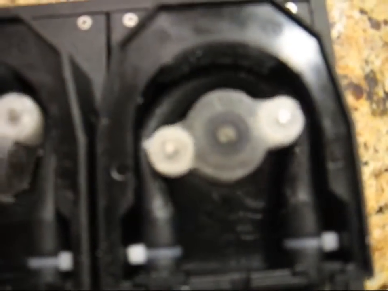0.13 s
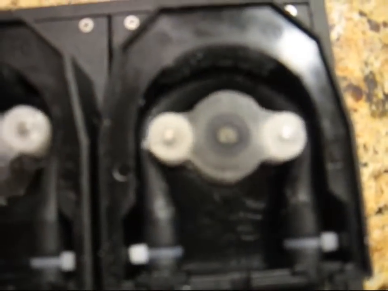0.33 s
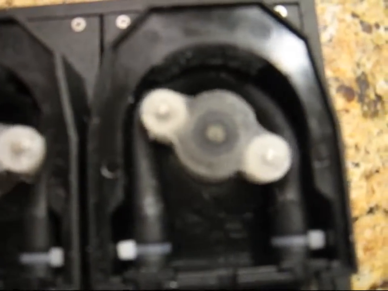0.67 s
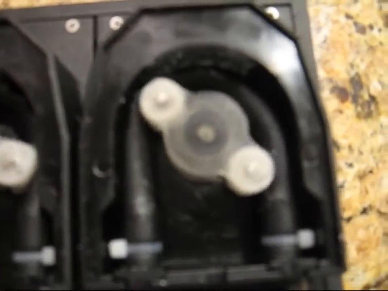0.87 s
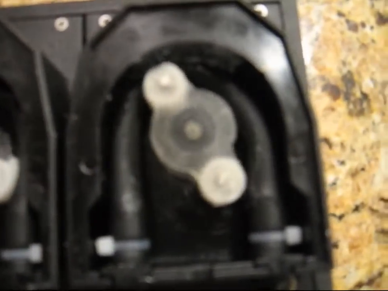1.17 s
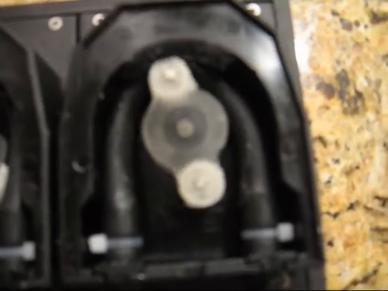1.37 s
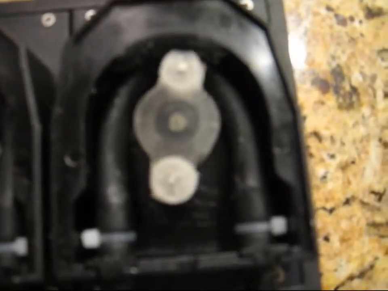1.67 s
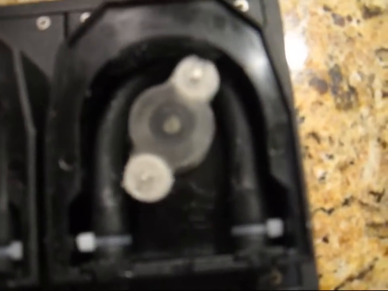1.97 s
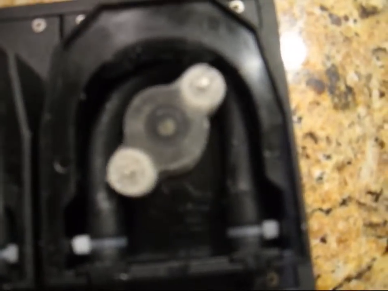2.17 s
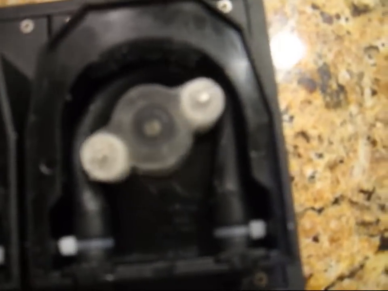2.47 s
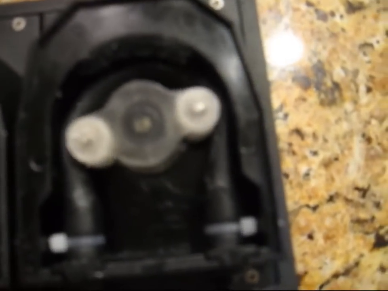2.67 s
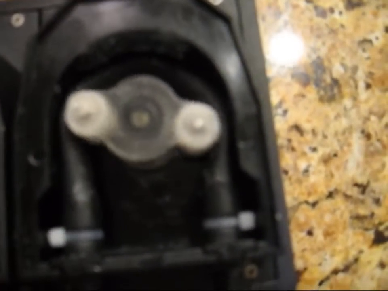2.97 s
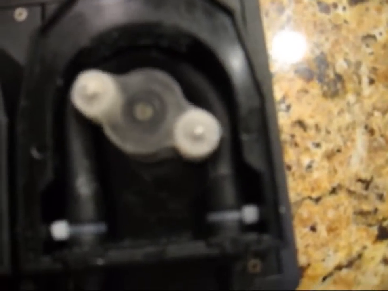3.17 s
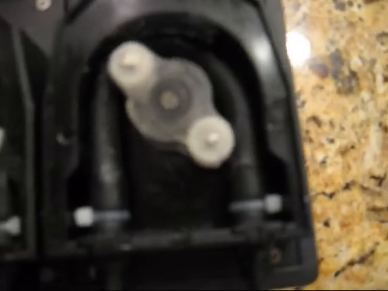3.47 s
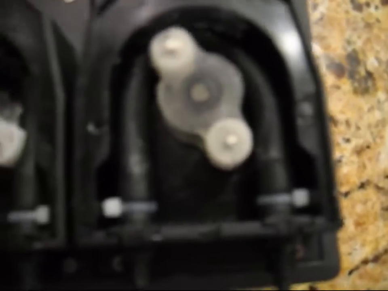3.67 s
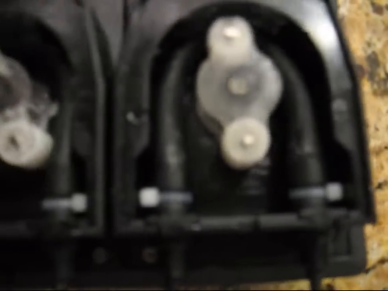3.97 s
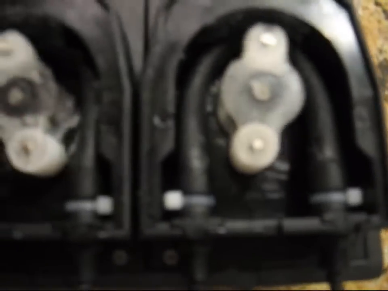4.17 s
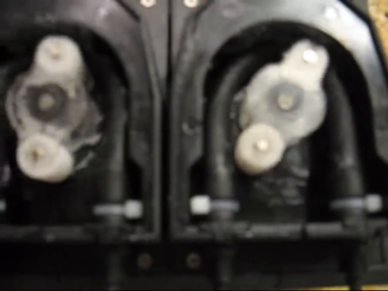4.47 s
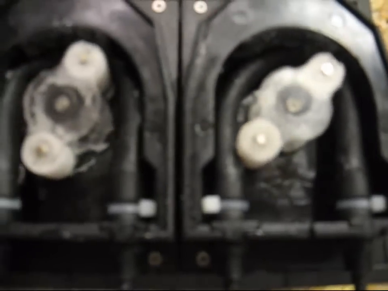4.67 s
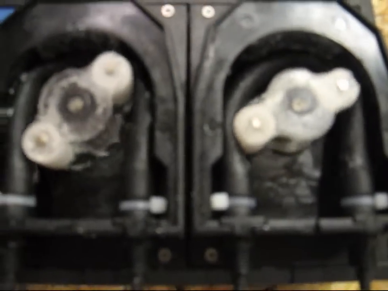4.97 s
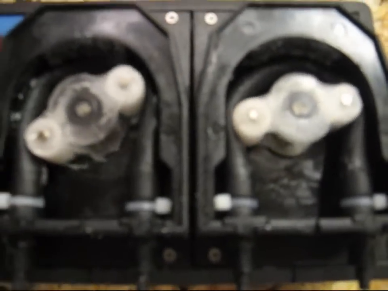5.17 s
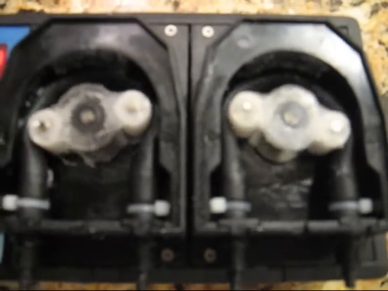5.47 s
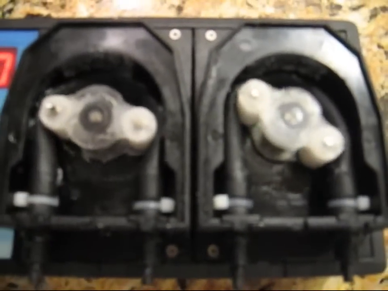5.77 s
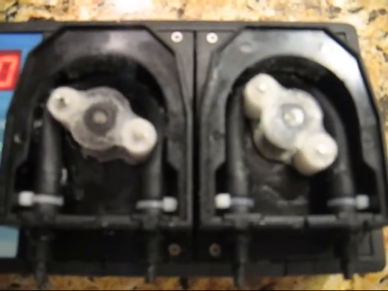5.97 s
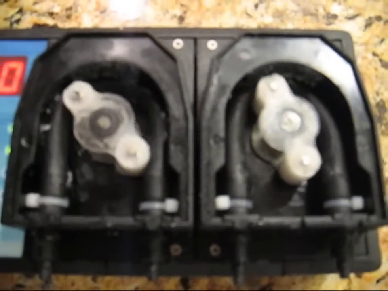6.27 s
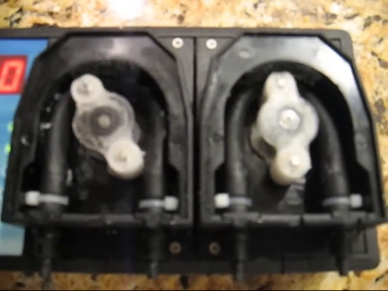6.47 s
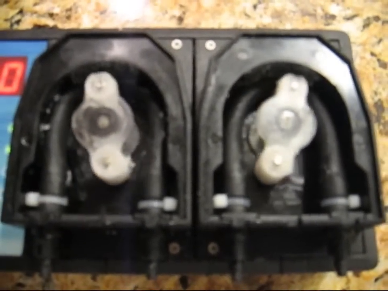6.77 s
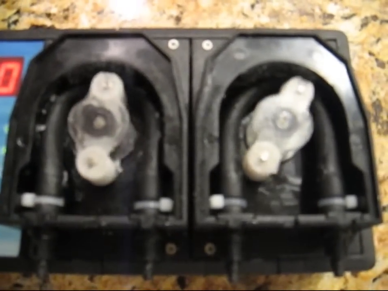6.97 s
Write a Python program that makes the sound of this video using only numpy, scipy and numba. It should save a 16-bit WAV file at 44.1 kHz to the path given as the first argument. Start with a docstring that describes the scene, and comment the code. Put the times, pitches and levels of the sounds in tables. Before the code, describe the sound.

A small pump motor hums and whines steadily with a soft pulsing throb, rollers ticking faintly, until loud plastic handling clatter bursts near the microphone.

```python
"""Two peristaltic pump heads turn slowly on a counter, close to the microphone of a hand-held camera.
The motors hum and whine on mains multiples; the gears sing and chatter, and one gear tone beats with the whine.
The rollers are filtered noise with faint sagging squeals; their ticks are short decaying modes.
Near five seconds the camera is handled: its case clatters and scrapes, and slow bumps push the microphone
so hard that the gain control ducks and recovers. Hiss and coarse sampling colour everything."""
import sys
import numpy as np
from scipy import signal
from scipy.fft import rfft, irfft
from scipy.io import wavfile
from scipy.ndimage import uniform_filter1d
from numba import njit

SR = 44100
rng = np.random.default_rng(int(sys.argv[2]) if len(sys.argv) > 2 else 0)


def to_wav(sig):
    """Store sig (one row per channel, or 1-D mono) as 16-bit WAV at the path in sys.argv[1].

    Samples outside -1..1 are clipped; the rate is SR.
    """
    pcm = np.clip(np.atleast_2d(sig), -1, 1) * 32767
    pcm = np.round(pcm).astype(np.int16)
    wavfile.write(sys.argv[1], SR, pcm.T)  # frames by channels


N = 313992
T = np.arange(N) / SR
FREQS = np.maximum(np.arange(N // 2 + 1) * SR / N, 1)
MAINS_HZ, SHAFT_HZ, PINION_HZ = 60, 44.55, 143.3


def undb(db):
    """Decibels to gain."""
    return 10 ** (np.asarray(db) / 20)


def unit(x):
    """Scale to rms 1."""
    return x / np.std(x)


def white():
    """White noise of rms 1."""
    return rng.standard_normal(N)


def walk(rate):
    """Smooth random wander of spread 1, mostly slower than the rate in Hz."""
    return unit(irfft(rfft(white()) * np.exp(-(FREQS / rate) ** 2), N))


def waver(flutter_db, rate):
    """Gain that wanders at random around 1."""
    return undb(flutter_db * walk(rate))


def shape(x, points):
    """Filter by a response of (Hz, dB) points, joined on a log frequency axis."""
    hz, db = np.transpose(points)
    response = undb(np.interp(np.log(FREQS), np.log(hz), db))
    return irfft(rfft(x) * response, N)


def colour(x, points):
    """Give white sound a spectrum of (Hz, dB per Hz) points."""
    return shape(x, points) * np.sqrt(SR / 2)


def resonate(x, peaks):
    """Pass white sound through steep-sided (Hz, width Hz, dB per Hz) resonances."""
    response = 0
    for hz, width, db in peaks:
        offset = (FREQS ** 2 - hz ** 2) / (FREQS * width)
        response = response + undb(db) / (1 + offset ** 2)
    return irfft(rfft(x) * response, N) * np.sqrt(SR / 2)


def tone(hz, db, wobble, flutter_db, rate):
    """A line whose phase (radians) and level waver with the load."""
    phase = 2 * np.pi * (hz * T + rng.random()) + wobble * walk(rate / 2)
    return np.sqrt(2) * undb(db + flutter_db * walk(rate)) * np.sin(phase)


def buzz(second, third, sixth):
    """Throb of the motor torque on the 2nd, 3rd and 6th mains multiples."""
    angle = 2 * np.pi * MAINS_HZ * T
    return 1 + second * np.cos(2 * angle) + third * np.cos(3 * angle) + sixth * np.cos(6 * angle)


def swells(rows):
    """Sum of bell-shaped (s, dB, width s) pushes."""
    return sum(undb(db) * np.exp(-((T - s) / width) ** 2 / 2) for s, db, width in rows)


def ring(modes, t, detune, rattle):
    """Decaying modes with peak 1; every contact point shifts them, and loose parts roughen them."""
    out = 0
    for k, (hz, db, t60) in enumerate(modes):
        shift, size = rng.standard_normal(2)
        rough = unit(uniform_filter1d(rng.standard_normal(len(t)), size=40))
        wave = np.sin(2 * np.pi * hz * (1 + detune * shift) * t) * (1 + rattle * rough)
        decay = np.exp(-np.log(1000) * t / t60)
        out = out + (-1) ** k * undb(db + 1.8 * size) * decay * wave
    return out / np.abs(out).max()


def strikes(rows, modes, edges, detune, rattle):
    """Each (s, ring dB, snap dB) blow snaps a hard edge and rings the body behind it."""
    out, t = np.zeros(N), T[:SR // 12]
    for s, ring_db, snap_db in rows:
        body = undb(ring_db) * ring(modes, t, detune, rattle)
        snap = undb(snap_db) * ring(edges, t, detune=0.027, rattle=1.0)
        start = int(s * SR)
        out[start:start + len(t)] += (body + snap)[:N - start]
    return out


# Slow bumps of the hand on the camera. Each row: centre in seconds, level in dB, width in seconds.
HAND_BUMPS = [(4.925, 0.5, 0.015), (5.393, 3, 0.016)]


def hand_bumps():
    """The hand shoves the microphone: a push below hearing with a dull rumble on top."""
    rumble = unit(resonate(white(), [(225, 730, 0)]))
    return swells(HAND_BUMPS) * (1 + undb(-22.5) * rumble)


# Case scraping around the knocks. Each row: centre in seconds, level in dB, width in seconds.
CASE_SCRAPES = [(4.892, -30.5, 0.013), (4.925, -18.5, 0.011), (5.37, -39, 0.01), (5.392, -17.5, 0.007)]
# Resonances of scraping plastic. Each row: centre in Hz, width in Hz, relative level in dB.
SCRAPE_RESONANCES = [(750, 1200, -1), (1840, 830, -2.5), (2840, 630, 3), (5700, 1300, -11.5)]


def case_scrapes():
    """Many tiny random slips excite the plastic resonances."""
    slips = white() * (rng.random(N) < 1500 / SR)  # about 1500 slips per second
    return swells(CASE_SCRAPES) * unit(resonate(slips, SCRAPE_RESONANCES))


# a rattle's small knocks: dB over its scrape, and their scatter
RATTLE_RING_DB, RATTLE_SNAP_DB, RATTLE_SCATTER_DB = 4, -7.5, 7


def rattles(count):
    """Small (s, ring dB, snap dB) knocks scattered at random over each scrape."""
    rows = []
    for s, db, width in CASE_SCRAPES:
        for _ in range(count):
            time = s + width * rng.uniform(-1.1, 1)
            ring_db = db + RATTLE_RING_DB + RATTLE_SCATTER_DB * rng.standard_normal()
            snap_db = db + RATTLE_SNAP_DB + RATTLE_SCATTER_DB * rng.standard_normal()
            rows.append((time, ring_db, snap_db))
    return rows


# Main handling knocks. Each row: start in seconds, ring level in dB, snap level in dB.
CASE_KNOCKS = [(4.8765, -16, -39), (4.8885, -16, -18), (4.9005, -15.5, -13), (4.9132, -13, -29),
               (4.916, -5.5, -11.5), (4.9262, -5, -10), (4.932, -11, -13), (4.9372, -2.5, -18),
               (5.065, 4.5, -40), (5.363, -11, -42), (5.3715, -14, -32), (5.3822, -1, -32), (5.387, -1, -9),
               (5.394, -3.5, -7), (5.399, -5, -13)]
# Modes of the plastic camera case. Each row: nominal Hz, relative level in dB, 60 dB decay in seconds.
CASE_MODES = [(220, -23, .03), (361, -20.5, 0.065), (582, -7, 0.03), (865, -12.5, 0.049), (1196, -5, 0.024),
              (1645, 0.5, 0.017), (1775, 1, 0.02), (2223, -3.5, 0.02), (2560, -15, 0.035),
              (3140, -17, 0.026), (3070, -27, 0.051), (3400, -35, 0.023), (5120, -38, 0.016)]
# Modes of its hard plastic edges. Each row: nominal Hz, relative level in dB, 60 dB decay in seconds.
CASE_EDGES = [(2950, 2, 0.0091), (3516, 1, 0.0098), (4500, -6, 0.0065), (4980, -1, 0.0089),
              (5280, -12, 0.0048)]


def case_clatter():
    """Knocks and rattles ring the case in the hand, right at the microphone."""
    return strikes(list(CASE_KNOCKS) + rattles(count=3), CASE_MODES, CASE_EDGES, detune=0.04, rattle=0.3)


# each bounce follows after a gap, rings a little less and snaps much less
BOUNCE_S, BOUNCE_RING_DB, BOUNCE_SNAP_DB = 0.0091, -0.5, -12


def bounced(rows):
    """Each tick followed by its weakening bounces."""
    out = []
    for s, ring_db, snap_db, bounces in rows:
        for k in range(int(bounces) + 1):
            out.append((s + k * BOUNCE_S, ring_db + k * BOUNCE_RING_DB, snap_db + k * BOUNCE_SNAP_DB))
    return out


# Ticks of rollers and tubes. Each row: start in seconds, ring level in dB, snap level in dB, bounces.
ROLLER_TICKS = [(.375, -35.5, -28, 0), (1.0768, -20.5, -22.5, 2), (1.4365, -20.5, -26, 0),
                (1.941, -41, -33, 0), (2.182, -23, -18, 0), (3.571, -26, -46, 0), (3.935, -29, -34, 0),
                (4.8385, -16.5, -44, 0), (5.2887, -19.5, -42, 0), (5.3028, -16, -38, 0),
                (5.5265, -15.5, -41, 0), (5.5705, -18, -41, 0), (5.5975, -20.5, -44, 0),
                (6.0703, -20.5, -24, 2), (6.9378, -44, -21.5, 0)]
# Modes of the pump housing. Each row: nominal Hz, relative level in dB, 60 dB decay in seconds.
HOUSING_MODES = [(760, -16, 0.017), (948, -2.5, 0.018), (1195, -0.5, 0.019), (1414, -4, 0.021),
                 (1785, -4.5, 0.025), (2400, -5, 0.016), (3454, -18, 0.024)]
# Hard edges of the rollers. Each row: nominal Hz, relative level in dB, 60 dB decay in seconds.
ROLLER_EDGE_MODES = [(2885, 0, 0.016), (3620, 3.5, 0.013), (4600, -8.5, 0.0088), (5600, -13, .006)]


def roller_ticks():
    """Rollers tick over the tubes: a hard edge snaps and the housing rings, sometimes with bounces."""
    return strikes(bounced(ROLLER_TICKS), HOUSING_MODES, ROLLER_EDGE_MODES, detune=.025, rattle=.35)


SQUEEZE_ATTACK_S, SQUEEZE_RELEASE_S, SQUEAL_BUILD_S = 0.094, .15, 0.3


def squeeze(start, length, attack_s):
    """Pressure of one roller: it builds, holds and lets go."""
    build = np.clip((T - start) / attack_s, 0, 1)
    let_go = np.clip(1 - (T - start - length) / SQUEEZE_RELEASE_S, 0, 1)
    return build * let_go


# A roller squeezes its tube.
# Each row: start in seconds, length in seconds, rub in dB, squeal in dB, starting pitch in Hz.
TUBE_SQUEEZES = [(0.496, .9, -49.5, -54, 2726), (3.25, 0.6, -53, -52, 2713),
                 (4.098, 0.79, -51.5, -57, 2400), (5.7, 0.63, -50, -56.5, 2630)]
# Resonances of the rubbing tube. Each row: centre in Hz, width in Hz, relative level in dB.
TUBE_RESONANCES = [(2260, 320, 10), (2604, 510, 15.5), (3620, 800, -13.5)]
SQUEAL_SAG_HZ_PER_S = 310
ROLLING_DB = -58.5  # light rub between the squeezes


def rollers():
    """Rubber rubs in time with the torque ripple; each squeeze builds into a faint, sagging squeal."""
    ripple = buzz(.2, .45, .3)
    friction = white() * ripple * waver(flutter_db=2.8, rate=30)
    # uneven stick-slip widens the squeal's line
    slip = (walk(110) + 1j * walk(100)) * waver(flutter_db=0.74, rate=25)
    rub, squeal = undb(ROLLING_DB), 0
    for start, length, rub_db, squeal_db, hz in TUBE_SQUEEZES:
        rub = np.maximum(rub, undb(rub_db) * squeeze(start, length, SQUEEZE_ATTACK_S))
        phase = 2 * np.pi * np.cumsum(hz - SQUEAL_SAG_HZ_PER_S * (T - start)) / SR
        line = unit(np.real(slip * np.exp(1j * phase)))
        squeal = squeal + undb(squeal_db) * squeeze(start, length, SQUEAL_BUILD_S) * line
    return rub * unit(resonate(friction, TUBE_RESONANCES)) + squeal * ripple


# Gear chatter spectrum. Each row: frequency in Hz, level in dB per Hz.
CHATTER_SPECTRUM = [(25, -71.5), (55, -66), (100, -78), (140, -71), (240, -66.5), (350, -64.5),
                    (490, -72.5), (750, -67.5), (1100, -76.5), (1650, -76.5), (2050, -81), (3600, -86.5),
                    (5500, -94.5)]
# Gearbox resonances. Each row: centre in Hz, width in Hz, level in dB per Hz.
GEARBOX_RESONANCES = [(550, 120, -72.5), (1580, 250, -95.5)]


def gear_chatter():
    """Loose teeth strike at random in a noise that throbs with the torque, and the gearbox resonates."""
    teeth = unit(white() * (rng.random(N) < 900 / SR))  # about 900 strikes per second
    drive = unit(white() + .7 * teeth) * buzz(.09, .13, .08) * waver(flutter_db=.7, rate=25)
    return colour(drive, CHATTER_SPECTRUM) + resonate(white(), GEARBOX_RESONANCES)


# Gear tones. Each row: multiple of the shaft rate, level in dB.
SHAFT_TONES = [(3, -59.5), (4, -53), (5, -52.5), (6, -52.5), (9, -52), (12, -55.5), (16, -52.5),
               (18, -55.5), (36, -59)]
# Pinion tones. Each row: multiple of the pinion's mesh rate, level in dB.
PINION_TONES = [(1, -45), (2, -49.5), (4, -54)]
# Other tones of the drive. Each row: frequency in Hz, level in dB.
DRIVE_TONES = [(164.9, -55), (236.2, -54.5), (282, -55.5), (298, -59.5), (387.6, -53.5), (544, -52),
               (827, -58.5), (886.2, -53.5), (1467.6, -60)]


def gear_song():
    """Meshing teeth sing as wavering tones; the speed ripple grows with the order."""
    lines = [(k * SHAFT_HZ, db) for k, db in SHAFT_TONES]
    lines += [(k * PINION_HZ, db) for k, db in PINION_TONES]
    lines += list(DRIVE_TONES)
    return sum(tone(hz, db, wobble=hz / 700, flutter_db=-0.3, rate=9.1) for hz, db in lines)


# Mains hum. Each row: multiple of the mains, level in dB.
HUM_TONES = [(1, -69.5), (2, -41.5), (4, -56.5), (7, -58), (8, -56.5), (12, -61), (20, -63.5)]


def motor_hum():
    """The motors hum steadily on multiples of the mains."""
    return sum(tone(k * MAINS_HZ, db, wobble=.08, flutter_db=0.5, rate=6) for k, db in HUM_TONES)


# The gear slows a little, so the beat quickens and deepens.
# Each row: time in seconds, beats per second, change of the gear tone in dB.
GEAR_BEAT = [(2.25, 2.945, -1.5), (2.35, 3.93, 0)]
FIRST_SWELL_S = .17
WHINE_DB, GEAR_TONE_DB = -31, -45.5


def motor_whine():
    """The loud sixth mains multiple pulses as a slightly slower gear tone beats against it."""
    phase = 2 * np.pi * (6 * MAINS_HZ * T + rng.random()) + .14 * walk(6)
    s, rate, gear_db = np.transpose(GEAR_BEAT)
    beats = np.cumsum(np.interp(T, s, rate)) / SR
    # the two tones are in step at the first swell
    lag = 2 * np.pi * (beats - np.interp(FIRST_SWELL_S, T, beats))
    whine = undb(WHINE_DB) * waver(flutter_db=1.0, rate=14) * np.sin(phase)
    gear_level = undb(GEAR_TONE_DB + np.interp(T, s, gear_db))
    gear = gear_level * waver(flutter_db=1.3, rate=5.7) * np.sin(phase - lag)
    return np.sqrt(2) * (whine + gear)


# Level of the pump drives over time. Each row: time in seconds, level in dB.
PUMP_LEVEL = [(0, 0), (2.5, -1), (4.8, -1), (6, -2.5), (6.87, -1.5), (6.96, -5.5), (7.05, -4)]


def pump_drives():
    """Motors and gears together, their level drifting and dipping near the end."""
    s, db = np.transpose(PUMP_LEVEL)
    level = undb(np.interp(T, s, db))
    return level * (gear_chatter() + gear_song() + motor_hum() + motor_whine())


def scene():
    """Handling, ticks, rollers and pump drives, at one microphone."""
    handling = hand_bumps() + case_scrapes() + case_clatter()
    return (handling + roller_ticks() + rollers() + pump_drives())[None]


@njit
def follow(x, attack, release):
    """Envelope that rises quickly and sinks slowly."""
    out, e = np.empty(len(x)), 0.
    for i in range(len(x)):
        e += (abs(x[i]) - e) * (attack if abs(x[i]) > e else release)
        out[i] = e
    return out


def gain_control(x, knee_db, attack_s, release_s, lag_s):
    """Turn the sound down, a little late, as its envelope passes a soft knee."""
    over = follow(x, 1 / (attack_s * SR), 1 / (release_s * SR)) / undb(knee_db)
    late = np.interp(T - lag_s, T, over)
    return x / np.cbrt(1 + late ** 3)


# Microphone hiss. Each row: frequency in Hz, level in dB per Hz.
MICROPHONE_HISS = [(30, -84), (300, -88.5), (1000, -90.5), (2500, -85.5), (4000, -93.5), (5500, -95)]
# Smoothing of the camera's coarse samples. Each row: frequency in Hz, gain in dB.
SAMPLE_SMOOTHING = [(4500, -1), (5500, -2.5), (7000, -14), (8000, -25), (8800, -36), (9400, -46.5),
                    (10500, -81.5), (11600, -81), (12600, -51.5), (13500, -42), (15000, -30)]
TOP_HZ = 15900


def record(dry):
    """Camera: gain control, bass cut, hiss and coarse samples that mirror the mids faintly into the treble."""
    x = gain_control(dry[0], knee_db=-16.5, attack_s=0.015, release_s=0.2, lag_s=0.014)
    bass_cut = 1 / np.sqrt(1 + (52 / FREQS) ** 10)  # corner at 52 Hz
    x = irfft(rfft(x) * bass_cut, N) + colour(white(), MICROPHONE_HISS)
    x = signal.sosfilt(signal.butter(10, SR / 8, fs=SR, output="sos"), x)
    every_fourth = np.arange(N) % 4 == 0
    x = shape(4 * x * every_fourth, SAMPLE_SMOOTHING)
    return signal.sosfilt(signal.ellip(10, .2, 80, TOP_HZ, fs=SR, output="sos"), x)[None]


dry = scene()
out = record(dry)
to_wav(out)
```